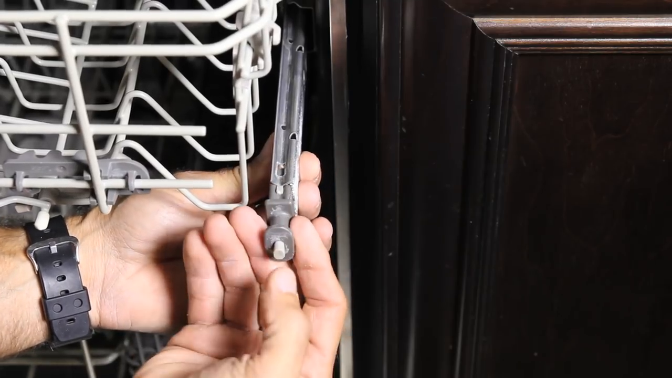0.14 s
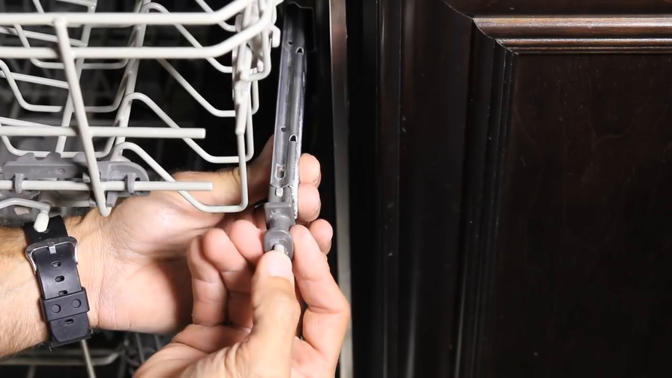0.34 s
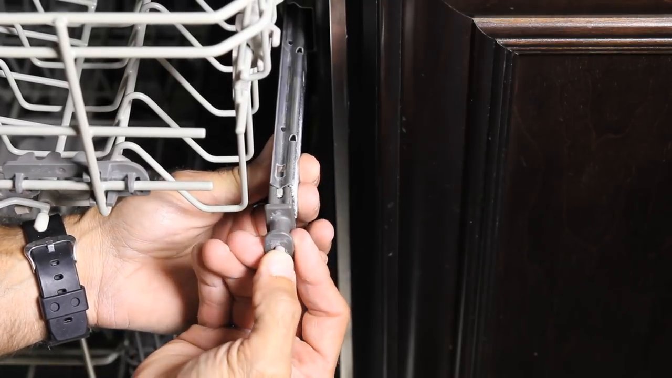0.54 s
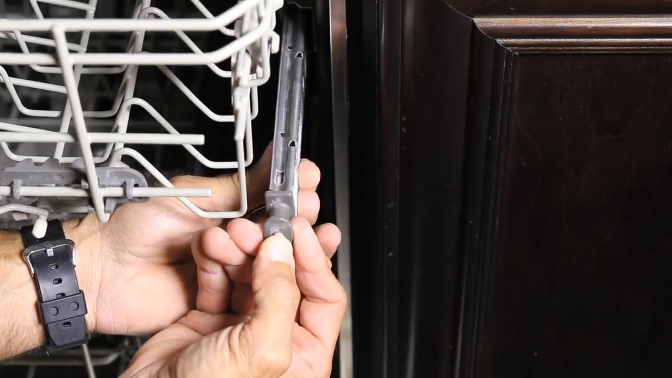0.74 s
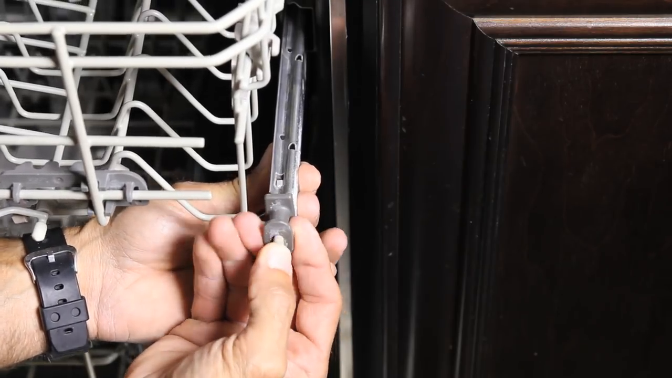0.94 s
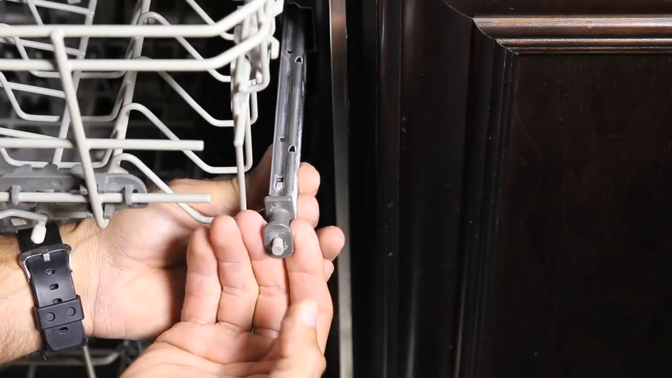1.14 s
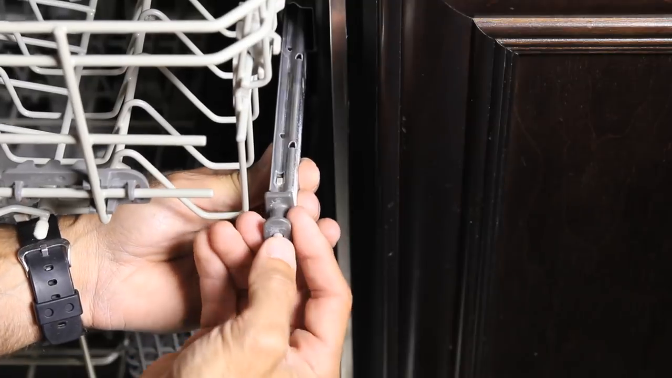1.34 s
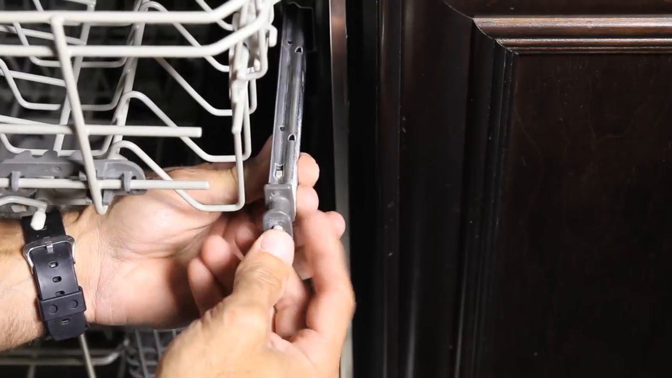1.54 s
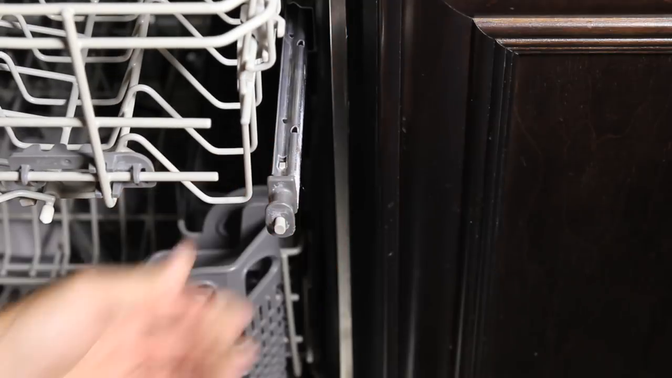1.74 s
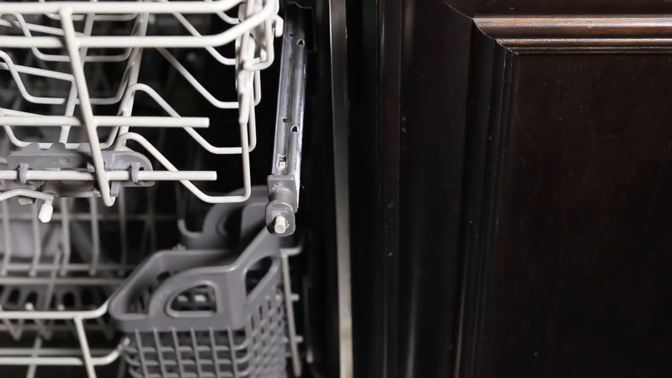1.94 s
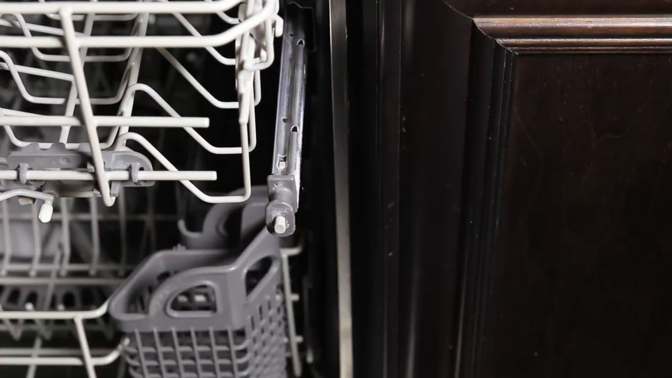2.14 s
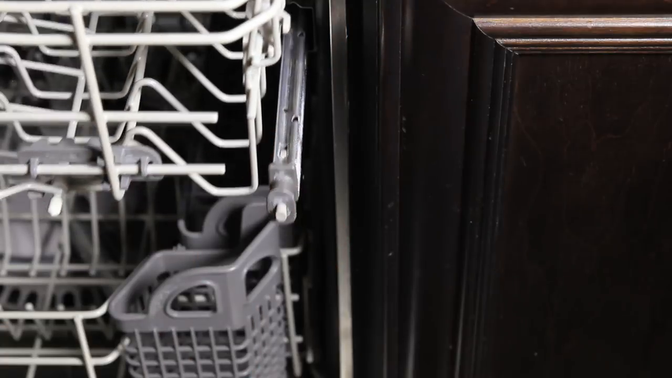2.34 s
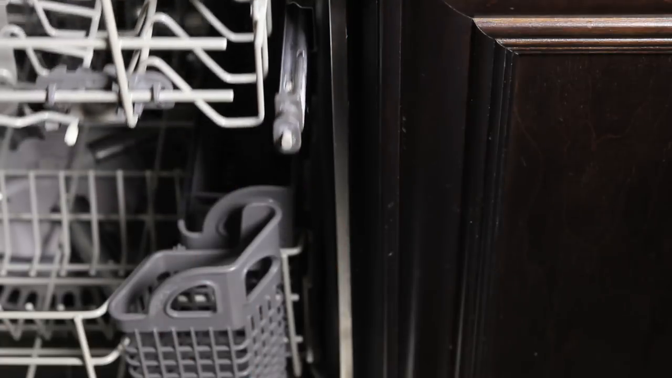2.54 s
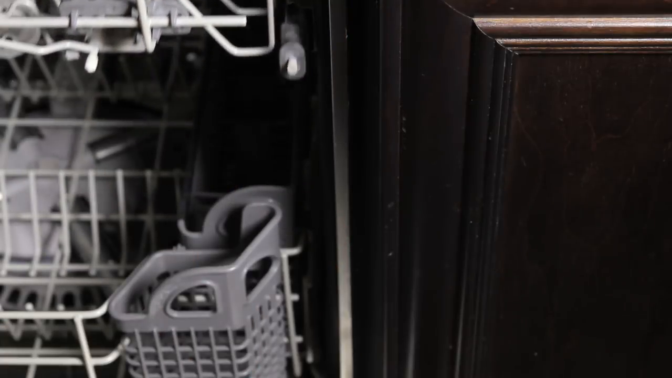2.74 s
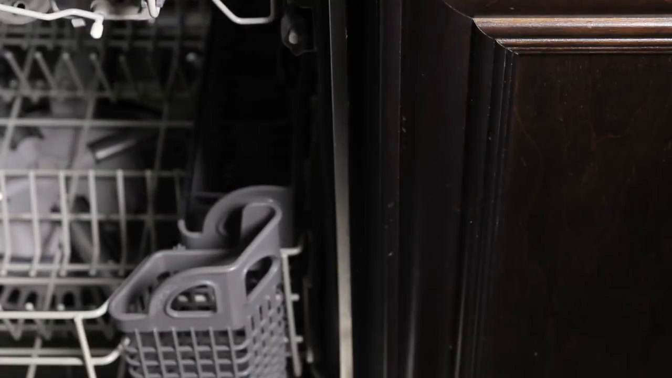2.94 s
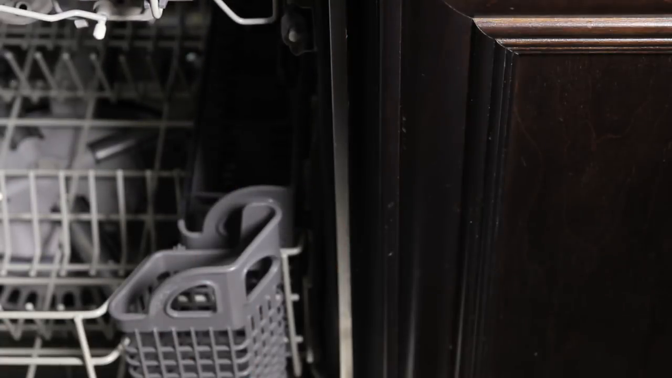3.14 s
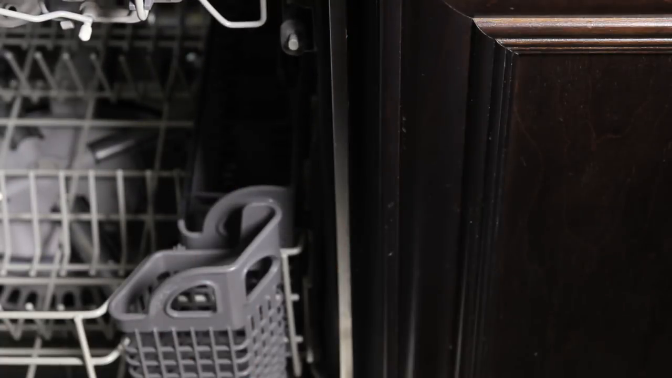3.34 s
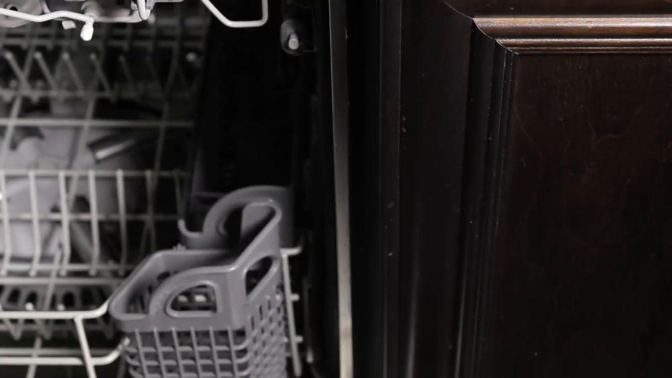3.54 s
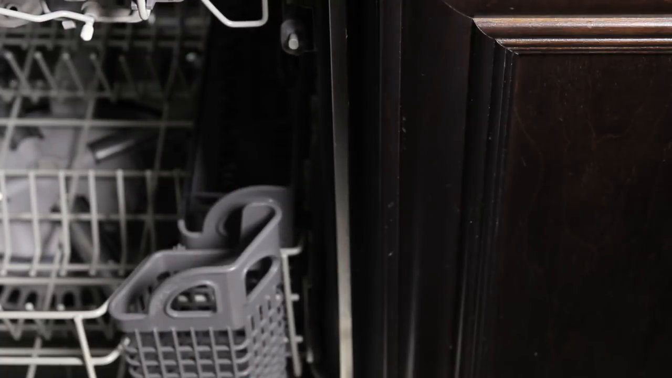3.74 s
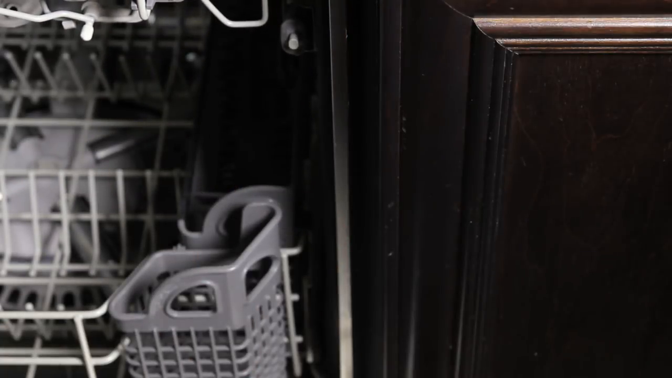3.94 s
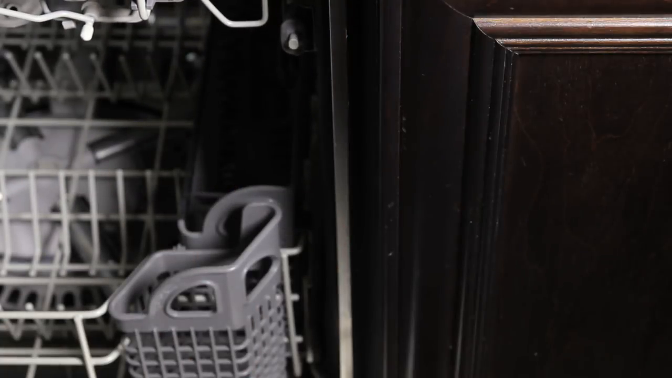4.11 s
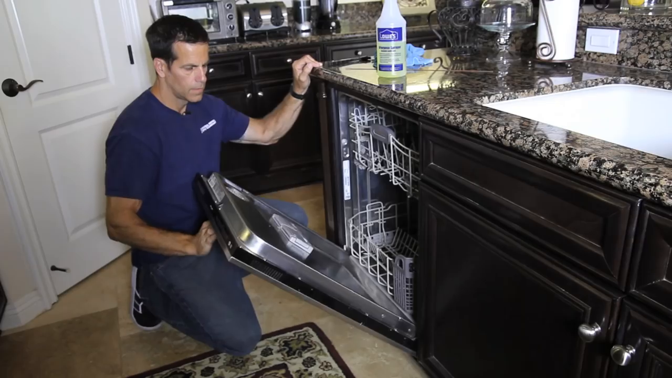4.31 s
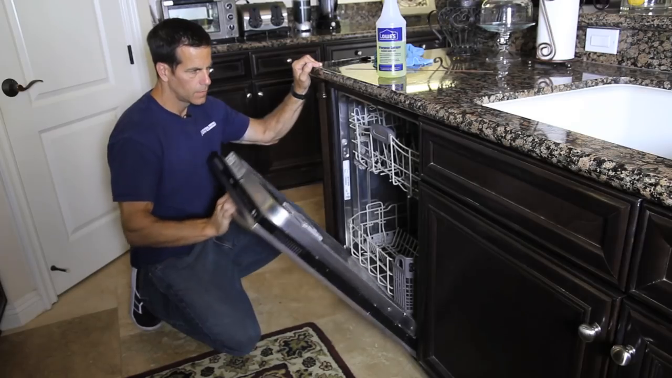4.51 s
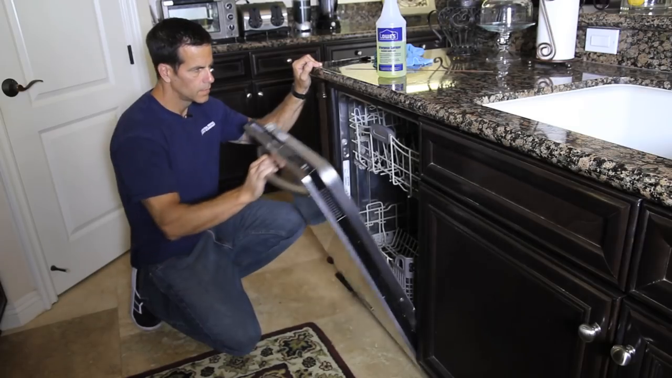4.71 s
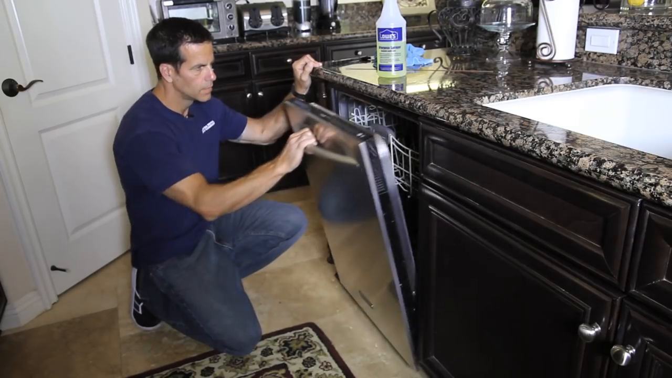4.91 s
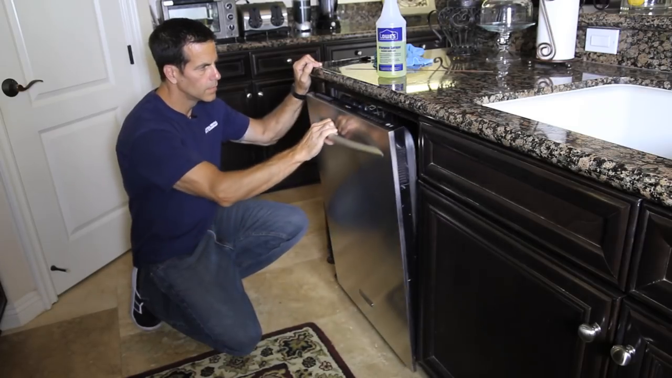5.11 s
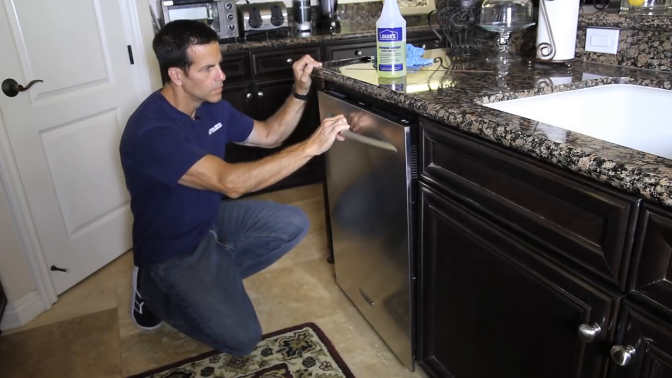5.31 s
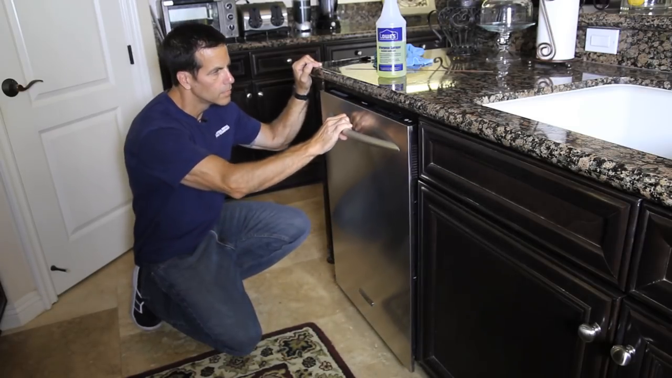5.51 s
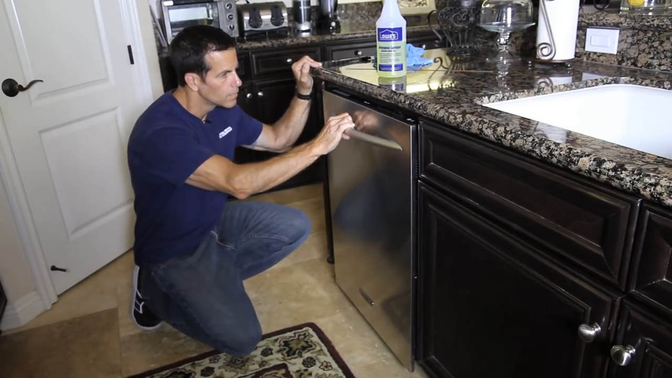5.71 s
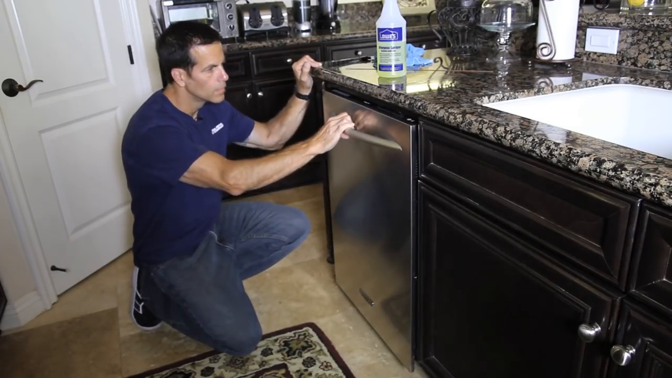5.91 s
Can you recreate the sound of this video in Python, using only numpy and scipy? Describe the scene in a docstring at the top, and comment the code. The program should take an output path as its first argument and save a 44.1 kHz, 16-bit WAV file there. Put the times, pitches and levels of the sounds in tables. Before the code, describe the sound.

Close to the microphone in a quiet kitchen, a small plastic stop ticks and snaps onto a steel rail, ending with a bright metallic clink. Wheels knock and a wire rack rolls in briefly, hits the hollow tub with a low boom and rattles to rest. After a near-silent gap with faint rumble, a door farther away double-clicks at its latch and is pushed shut with a hard, loud knock.

```python
"""A plastic end stop is clicked onto a dishwasher's steel rail, close to the microphone.
The wire rack rolls in on its wheels, bumps the back of the tub and rattles to rest.
Then, heard from further off in the kitchen, the door swings up, meets its latch and is pushed shut.
Blows ring dense and clear resonances of each part; coloured noise makes rolling, rumble, rustle and air."""
import sys
import numpy as np
from scipy import signal
from scipy.fft import rfft, irfft, next_fast_len
from scipy.io import wavfile

SR = 44100
rng = np.random.default_rng(int(sys.argv[2]) if len(sys.argv) > 2 else 0)


def generate_wav(signal):
    """Clip the signal to [-1, 1] and save it as 16-bit WAV at the path in sys.argv[1]."""
    frames = np.transpose(np.atleast_2d(signal))
    scaled = np.clip(frames, -1, 1) * 32767
    pcm = np.round(scaled).astype(np.int16)
    wavfile.write(sys.argv[1], SR, pcm)


N = 267422
TIME = np.arange(N) / SR  # seconds through the scene
RING = np.arange(2 ** 15) / SR  # seconds since a blow

# In the tables of the struck parts:
# Blows: each row: start in seconds, level in dB before tilting, extra bass in dB, extra treble in dB,
# chatter time in seconds (the chatter's fade uses at least 0.4 ms).
# Body, dense resonances: each row: frequency in Hz, relative level in dB per Hz, t60 in seconds.
# Modes, clear resonances: each row: frequency in Hz, relative energy in dB, t60 in seconds.

# Kitchen reverberation. Each row: frequency in Hz, relative level in dB per Hz, t60 in seconds.
KITCHEN_REVERB = [(61, 2, 1), (250, 1, 0.53), (700, 2, 0.63), (1920, -2, 0.65), (4970, -3, 0.68),
                  (10000, -4.5, 0.36), (15300, 0.5, 0.16)]


def amp(db):
    """Decibels to gain."""
    return 10 ** (np.asarray(db) / 20)


def unit(x):
    """Scale each row to an energy of one."""
    return x / np.sqrt(np.sum(x ** 2, axis=-1, keepdims=True))


def at_hz(hz, table, axis=1):
    """Read one column of a table on a log-frequency axis."""
    table = np.array(table)
    return np.interp(np.log(hz + 1), np.log(table[:, 0]), table[:, axis])


def coloured(x, colour):
    """Give x a spectrum and an rms of one."""
    size = next_fast_len(N)
    gain = amp(at_hz(np.fft.rfftfreq(size, 1 / SR), colour))
    y = irfft(rfft(x, size) * gain, size)[:N]
    return y / y.std()


def rub(colour, grain_db):
    """Dense tiny slips of uneven size, coloured by the part that they shake."""
    steps = rng.standard_normal(N // 100 + 1)
    sizes = amp(grain_db * np.repeat(steps, 100)[:N])  # a new size every 100 samples
    return coloured(rng.standard_normal(N) * sizes, colour)


def decay(t60):
    """Envelope that falls 60 dB in t60 seconds."""
    return np.exp(-np.minimum(np.log(1000) * RING / max(t60, 1e-3), 20))


def mode(hz, t60):
    """One damped resonance."""
    return unit(np.sin(2 * np.pi * hz * RING) * decay(t60))


def add(track, s, db, sound):
    """Mix in a sound; db is the level of a sound of unit energy if spread over 20 ms."""
    start = max(int(s * SR), 0)
    part = sound[:max(N - start, 0)]
    track[start:start + len(part)] += amp(db) * np.sqrt(SR / 50) * part


def dense_rings(table, count):
    """Countless overlapping modes, dying at their own rate in each third of an octave."""
    hz = np.fft.rfftfreq(len(RING), 1 / SR)
    edges = np.geomspace(25, 17000, 29)[:, None]
    centres, widths = np.sqrt(edges[1:] * edges[:-1])[:, 0], np.diff(edges[:, 0])
    in_band = (hz >= edges[:-1]) & (hz < edges[1:])
    bands = irfft(rfft(rng.standard_normal(len(RING))) * in_band).astype(np.float32)
    fades = np.array([decay(t60) for t60 in at_hz(centres, table, axis=2)], np.float32)
    gains = (amp(at_hz(centres, table)) * np.sqrt(widths)).astype(np.float32)
    rings = []
    for shift in rng.integers(len(RING), size=count):  # every ring starts elsewhere in the noise
        rings.append(gains @ unit(np.roll(bands, shift, axis=1) * fades))
    return unit(np.array(rings))


def chatter_impacts(chatter):
    """A loose part bounces: random small impacts that swell and die away."""
    contact_rate = 900  # mean impacts a second
    hits = rng.random(len(RING)) < contact_rate / SR
    contacts = rng.standard_normal(len(RING)) * hits
    return unit(contacts * (RING + 1e-4) * np.exp(-RING / max(chatter, 4e-4)))


def strike(blows, body, modes, modes_db, chatter_db, room_db):
    """Each blow rings the part's modes and the kitchen; loose contact adds a quick train of smaller impacts."""
    hz, track = np.fft.rfftfreq(len(RING), 1 / SR), np.zeros(N)
    bass = 1 / (1 + (hz / 330) ** 2)
    treble = np.log1p((np.minimum(hz, 7500) / 1500) ** 2) / 3
    # neighbouring modes start with opposite signs
    clear = np.array([(-1) ** k * amp(db + modes_db) * mode(f, t60) for k, (f, db, t60) in enumerate(modes)])
    # the diffuse field has the part's colour and the room's decay, and builds up over the first reflections
    diffuse = [(f, db + at_hz(f, KITCHEN_REVERB), at_hz(f, KITCHEN_REVERB, axis=2)) for f, db, _ in body]
    build_up = 1 - np.exp(-(RING / 0.0031) ** 2)
    tails = dense_rings(diffuse, count=len(blows)) * amp(room_db) * build_up
    rings = dense_rings(body, count=len(blows))
    loose = rfft(dense_rings(body, count=1)[0])
    for (s, db, bass_db, treble_db, chatter), dense, tail in zip(blows, rings, tails):
        spot = amp(2.94 * rng.standard_normal(len(modes)))  # where it lands favours some modes
        rattle = irfft(loose * rfft(chatter_impacts(chatter)))
        rattle *= amp(chatter_db) * abs(chatter) / 0.0046  # longer chatter is louder
        sound = unit(dense + spot @ clear + rattle) + tail
        # a hard contact is bright, a heavy one moves the whole part
        sound = irfft(rfft(sound) * amp(bass_db * bass + treble_db * treble))
        add(track, s, db, sound[:-len(RING) // 20])  # leave out the end, where the filter wraps round
    return track


def swells(rows, attack_s, release_s, sag_db_per_s):
    """Gain of a series of swells: each takes hold, slackens at the sag rate and dies away."""
    gain = np.zeros(N)
    for s, length, db in rows:
        age = np.maximum(TIME - s, 0)
        shape = np.minimum(age / attack_s, 1) * np.exp(-np.maximum(age - length, 0) / release_s)
        gain = np.hypot(gain, shape * amp(db - sag_db_per_s * age))
    return gain


def kitchen_air():
    """The steady background at the microphone: noise with a fixed spectrum."""
    # Background spectrum. Each row: frequency in Hz, relative level in dB per Hz.
    air_colour = [(15, -34.5), (25, -1), (104, 4), (349, 3), (598, -2.5), (684, 2.5), (997, -11),
                  (2230, -25.5), (7910, -54), (15500, -26.5)]
    return amp(-66) * coloured(rng.standard_normal(N), air_colour)  # rms in dB


def hands():
    """The held rack rumbles with every shove; skin and cloth rustle as an arm speeds up and slows down."""
    # Rumble of the held rack. Each row: frequency in Hz, relative level in dB per Hz.
    grip_colour = [(25, -40), (50, -8), (110, -4), (200, -12), (330, -16), (500, -18.5), (900, -35.5),
                   (3000, -50.5)]
    # Shoves of the rack. Each row: start in seconds, length in seconds, level in dB.
    shoves = [(0, 0.083, -58.5), (.55, 0.056, -54.5), (0.663, 0.072, -52.5), (.93, 0.055, -55.5),
              (1.375, 0.16, -46), (1.582, 0.092, -43.5), (1.743, 0.21, -61.5)]
    # Rustle of skin and cloth. Each row: frequency in Hz, relative level in dB per Hz.
    rustle_colour = [(1500, 6), (3500, 0.5), (7000, 1.5), (10000, 0), (12500, -2.5), (15500, -10.5)]
    # Arm movements. Each row: time of fastest motion in seconds, half length in seconds, level in dB.
    moves = [(0.653, 0.066, -61), (1.654, 0.34, -64.5), (2.61, 0.5, -57.5), (3.654, 0.31, -63.5),
             (4.49, .08, -74), (5.998, 0.07, -60)]
    hold_db, let_go_s = -64, 2.5  # the hands hold the rack until they let go
    still_db = -71  # faint hiss between movements
    grip = swells([(0, let_go_s, hold_db)] + shoves, attack_s=0.018, release_s=0.057, sag_db_per_s=0)
    power = amp(still_db) ** 2
    for s, half, db in moves:
        power = power + amp(db) ** 2 * np.exp(-2 * ((TIME - s) / half) ** 2)
    held_rack = grip * rub(grip_colour, grain_db=1.5)
    rustle = np.sqrt(power) * rub(rustle_colour, grain_db=1.5)
    return held_rack + rustle


def plastic_stop():
    """The small plastic stop ticks and snaps on the rail, ringing its own short modes."""
    # Ticks and snaps, then the stop's dense and clear resonances (columns at the top).
    blows = [(.001, -41, -25, -10, .0038), (.049, -58, -26, 6.5, 0.0018), (.2252, -35, 13.5, -1.5, 0.0013),
             (.501, -42.5, 11, -5, 0.0008), (.556, -55, 23, -8, .0026), (.600, -40, 6, -11, .0007),
             (.633, -48.5, 14, 0, 0.0048), (1.235, -57.5, -20, -6.5, 0.006), (1.358, -56, -4, -0.5, 0.0071),
             (1.392, -45.5, -20, -4.5, 0.0035), (1.400, -41, 13.5, -1.5, .004), (1.451, -48, 13, 6, 0.0059),
             (1.5335, -39.5, -15, -22, .0013), (1.568, -35.5, -10, -14, 0.004)]
    body = [(80, -47, 0.24), (196, -26, 0.19), (305, -5, 0.2), (474, -5, 0.097), (694, -8, 0.15),
            (1200, -9, 0.085), (2080, -18, 0.095), (3320, -7.5, 0.091), (5530, -10.5, 0.042),
            (10100, -19, 0.12), (15500, -28, 0.032)]
    modes = [(515, -6.5, 0.078), (670, 0, 0.048), (767, -14, 0.079), (1470, -20, 0.2), (3073, -12, 0.15),
             (3570, -42, .12), (4290, -10, 0.13), (5360, -7.5, 0.079), (6600, -22, 0.063)]
    return strike(blows, body, modes, modes_db=-4.0, chatter_db=0, room_db=-13.5)


def steel_rail():
    """Steel rails and rack wires clink, with mostly high clear modes."""
    # Clinks, then the steel's dense and clear resonances (columns at the top).
    blows = [(.7109, -52.5, -9, -1, 0.0013), (.754, -61.5, 2, -2, .0038), (.974, -56, 2, -3.5, 0.0016),
             (1.424, -46.5, 6, -6, 0.0028), (1.461, -53, 9, 1, 0.0039), (1.608, -52.5, 4, 6, .0033),
             (1.632, -44.5, -18, 11.5, 0.0017), (1.645, -30.5, 8, -8.5, 0.0026),
             (1.7156, -46.5, 5, 0, 0.0044), (2.328, -42, 3, 0.5, 0.0083), (2.342, -43.5, 23.5, 5.5, 0.0038),
             (2.468, -50, -7, 3.5, 0.0058), (2.803, -29.5, -10, -0.5, 0.015), (2.822, -40.5, -10, 4, 0.027),
             (2.851, -29.5, 4, -7, .0048), (3.0146, -32.5, 0, -10, .002), (3.083, -39, -7, -12, .004),
             (3.2055, -46.5, 13, -4.5, 0.0011), (3.245, -40.5, 2, -9, 0.01),
             (3.2755, -29.5, 3.5, -13.5, 0.0064), (3.314, -43.5, 10, -2.5, 0.0021),
             (3.4995, -67.5, 25, 10.5, .0004)]
    body = [(102, -2.5, 0.53), (485, -1.5, 0.17), (1300, -4.5, 0.028), (2280, -13, 0.24), (3550, 1, 0.088),
            (5900, 1, 0.083), (8400, -4, 0.1), (11600, -6, 0.049), (15500, -22, .04)]
    modes = [(4570, -42.5, 0.29), (6200, -1, 0.032), (6300, -33, .07), (8750, -25, 0.6), (9360, -9, 0.047),
             (11200, -3, 0.14), (12000, -18, 0.094)]
    return strike(blows, body, modes, modes_db=-13.0, chatter_db=2.5, room_db=-12.5)


def wheels():
    """The wheels knock in their channel, ringing short modes in the middle of the spectrum."""
    # Knocks, then the wheels' dense and clear resonances (columns at the top).
    blows = [(2.2445, -38, -11, 9, 0.00053), (2.284, -35.5, 3, 5, 0.0074), (2.769, -36, 6, -22, 0.01),
             (3.069, -33, 3, 5.5, 0.00089), (3.291, -38.5, 22, 7, 0.00081), (3.307, -38.5, -1, -9, 0.0036),
             (3.343, -43, -12, 0, .005)]
    body = [(99.8, -10, 0.11), (540, -4, 0.14), (925, 6.5, 0.084), (1390, -5, 0.11), (2170, -25, 0.093),
            (3230, -8, 0.037), (4760, -21.5, 0.17), (10000, -26, 0.053), (15500, -36, .03)]
    modes = [(750, -7, 0.0384), (892, 3, 0.08), (980, 5.5, 0.059), (1110, 2, 0.034), (1240, -9, 0.11),
             (2710, -8, 0.045)]
    return strike(blows, body, modes, modes_db=-2.5, chatter_db=3.5, room_db=-7.5)


def small_parts(room_db):
    """Springy parts twang as damped sines, wheel and hinge tap as noise bursts, with the kitchen behind."""
    # Twangs of rack wire and hinge spring. Each row: start in seconds, level in dB, frequency in Hz,
    # t60 in seconds.
    twangs = [(2.2445, -40.5, 743, 0.048), (2.285, -36, 1051, 0.079), (2.927, -25, 309, 0.22),
              (4.8378, -63.5, 2150, 0.033)]
    # Short dry taps of wheel and hinge. Each row: start in seconds, level in dB, centre frequency in Hz,
    # t60 in seconds before the band filter.
    taps = [(3.2903, -42, 1160, 0.078), (4.862, -51, 240, 0.03), (4.862, -65.5, 1020, .012)]
    track = np.zeros(N)
    for s, db, hz, t60 in twangs:
        add(track, s, db, mode(hz, t60))
    for s, db, hz, t60 in taps:
        band = signal.butter(2, [hz / 2, min(hz * 2, SR / 3)], "bandpass", fs=SR, output="sos")
        burst = rng.standard_normal(len(RING)) * decay(t60)
        add(track, s, db, unit(signal.sosfilt(band, burst)))
    reverb = signal.fftconvolve(track, dense_rings(KITCHEN_REVERB, count=1)[0])[:N]
    return track + amp(room_db) * reverb


def roll():
    """The wheels grind along the rail, louder with speed and on the end ramp, unevenly over its surface."""
    # Grinding of wheels on rail. Each row: frequency in Hz, relative level in dB per Hz.
    grind_colour = [(30, -27), (85, 1.5), (220, -1), (280, 6.5), (400, 2.5), (720, -4), (900, -11.5),
                    (1300, -6.5), (2150, -29.5), (3300, -3), (5400, -9), (10900, -17.5), (15500, -32)]
    start_s, stop_s, speed_up_s = 2.26, 2.82, 0.1
    level_db, ramp_s, ramp_db = -46.5, 0.058, 13  # a short ramp at the end of the rail adds ramp_db
    knots = np.linspace(0, TIME[-1], num=240)
    bumps_db = 1.6 * np.interp(TIME, knots, rng.standard_normal(len(knots)))
    speed = (1 - np.exp(-np.maximum(TIME - start_s, 0) / speed_up_s)) * (TIME < stop_s)
    climb = np.clip(1 + (TIME - stop_s) / ramp_s, 0, 1)
    return speed * amp(level_db + ramp_db * climb + bumps_db) * rub(grind_colour, grain_db=1.0)


def tub():
    """The rack nudges and bumps the hollow tub, which booms with low, longer modes."""
    # Bumps, then the tub's dense and clear resonances (columns at the top).
    blows = [(2.342, -48.5, 9.5, -23, 0.0015), (2.774, -33, -1, -7, 0.016), (2.796, -29, 10.5, -3, 0.0064),
             (2.808, -16, 4.5, -5.5, .0009), (2.831, -22, 2.5, -0.5, 0.0066),
             (2.853, -24, -2.5, 5.5, 0.0011), (2.885, -25, -1, -23, 0.0012), (3.095, -35.5, -7, -9, 0.0049),
             (3.305, -41.5, 6, 0, 0.0017)]
    body = [(30, -37, .25), (71.6, -25, 0.28), (122, -7, 0.17), (185, -3, 0.061), (319, -6, 0.305),
            (435, -13.5, 0.25), (550, -13, 0.76), (910, -17.5, 0.24), (1415, -19, 0.15), (2050, -32, 0.3),
            (3700, -23, 0.047), (14900, -87, 0.16)]
    modes = [(47.5, -37, 0.05), (63.6, -7, 0.22), (135.6, -4, 0.51), (180.7, -6.5, 0.23),
             (210.6, -7.5, 0.97), (299.7, -0.5, 0.33), (325, -7.5, 0.16), (419, -5.5, 0.18),
             (522, -14.5, 0.46), (632, -15.5, 0.67), (924, -11, 0.3)]
    return strike(blows, body, modes, modes_db=-2.0, chatter_db=1, room_db=-7.5)


def low_rumble():
    """Low friction rumble: first the tub's rumble dying away, then pushes moving the door."""
    # Spectrum of the rumble. Each row: frequency in Hz, relative level in dB per Hz.
    rumble_colour = [(35, -63.5), (70, -6.5), (150, -5.5), (330, -0.5), (550, -5.5), (900, -8.5),
                     (2100, -19), (3200, -29), (8000, -34)]
    # Swells of the rumble. Each row: start in seconds, length in seconds, level in dB before the sag.
    rumbles = [(3.35, 0.56, -56.5), (3.95, 0.17, -55), (4.27, 0.57, -56.5), (5.17, 0.57, -54.5),
               (5.51, 0.4, -48)]
    gain = swells(rumbles, attack_s=0.014, release_s=0.17, sag_db_per_s=9.5)
    return gain * rub(rumble_colour, grain_db=1)


def thud_and_door():
    """The sound changes abruptly with a dull thud at 3.95 s; then the door meets its seal, catch and frame, and
    its panel rings."""
    # The thud and the door's contacts, then their dense and clear resonances (columns at the top).
    blows = [(3.9515, -44.5, 7, -24, .0044), (4.281, -58.5, 3, -23.5, 0.0074),
             (5.116, -41, 14, -13, 0.0066), (5.1218, -48, -26, 2, .004), (5.153, -41, -7, -9, .009),
             (5.173, -50, 24, -11, 0.0081), (5.2845, -43.5, 17, 12.5, 0.002),
             (5.4925, -51.5, 1, -3.5, .002), (5.527, -45, 15.5, -19, 0.017), (5.555, -26, 1.5, -6.5, 0.015),
             (5.5742, -23, -23, -4, 0.00037), (5.581, -17, -10, 3, 0.0014),
             (5.5827, -14, -3.5, 5.5, 0.00057), (5.586, -12, -3.5, -40, .0004)]
    body = [(35, -5, 0.53), (110, -20, 0.29), (204, 7, 0.055), (435, -0.5, 0.11), (610, 4.5, 0.05),
            (810, -3.5, 0.05), (1210, -3.5, 0.08), (1650, -5, 0.024), (2350, -11.5, 0.019),
            (3760, -21.5, 0.066), (10000, -19.5, 0.026), (15700, -33.5, 0.023)]
    modes = [(74.1, -17.5, 0.45), (182.8, -6, 0.55), (227.4, -16, .75), (310, -20, 0.36),
             (372.6, -8.5, 0.36), (594, -7.5, 0.4), (814, -8, 0.11), (862, -19.5, 0.43),
             (1120, -24.5, 0.17), (1202, -9.5, 0.036), (1335, -12.5, 0.26), (1680, -28, 0.59),
             (1700, -18, 0.097), (2170, -23, 0.27), (2303, -14, 0.04), (9900, -18.5, 0.022)]
    return strike(blows, body, modes, modes_db=-6, chatter_db=-2.0, room_db=-9.5)


def catch():
    """The sprung catch drops into the latch with two quick clicks."""
    # Clicks, then the catch's dense and clear resonances (columns at the top).
    blows = [(5.273, -31, -1, -14, 0.0013), (5.2845, -34.5, 0.5, 2.5, .0012)]
    body = [(100, -18.5, .1), (500, -9.5, 0.086), (865, 0.5, 0.062), (1400, -2.5, 0.043), (2190, -3.5, .05),
            (4000, -18.5, .05), (8000, -13.5, 0.029), (15600, -24, .025)]
    modes = [(838, 4.5, .05), (903, -6, .45), (1300, -10, .05), (2170, -8, 0.04), (2740, -10, 0.087),
             (3350, -19.5, .04), (5060, -15, .04)]
    return strike(blows, body, modes, modes_db=-1.0, chatter_db=-1.0, room_db=-11)


def scene():
    """The near rack and the more distant door share one kitchen."""
    rack = plastic_stop() + steel_rail() + wheels() + roll() + tub()
    rumble_and_door = low_rumble() + thud_and_door() + catch()
    return (kitchen_air() + hands() + rack + small_parts(room_db=-11) + rumble_and_door)[None]


def record(dry):
    """The recorder clips at full scale, then cuts the treble above 15.95 kHz."""
    low_pass = signal.ellip(10, .2, 70, 15950, fs=SR, output="sos")
    return signal.sosfilt(low_pass, np.clip(dry, -1, 1))


dry = scene()
out = record(dry)
generate_wav(out)
```